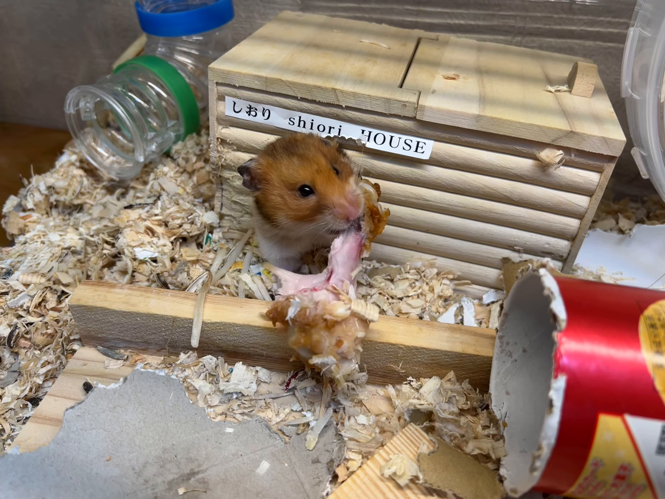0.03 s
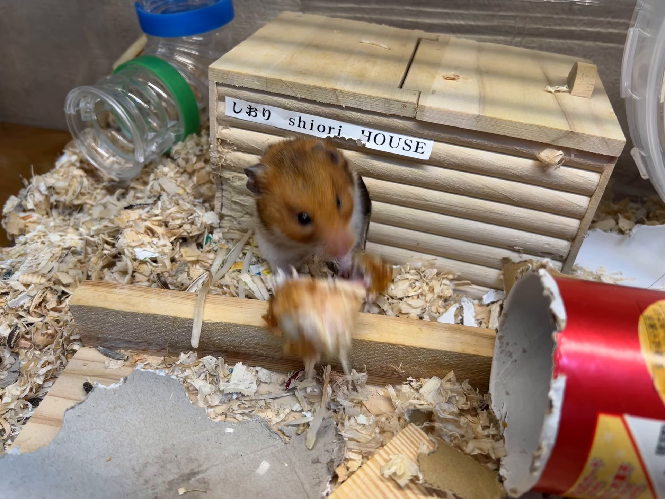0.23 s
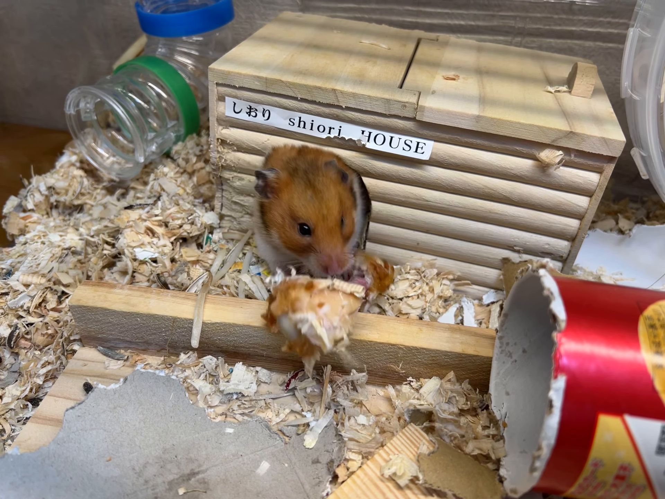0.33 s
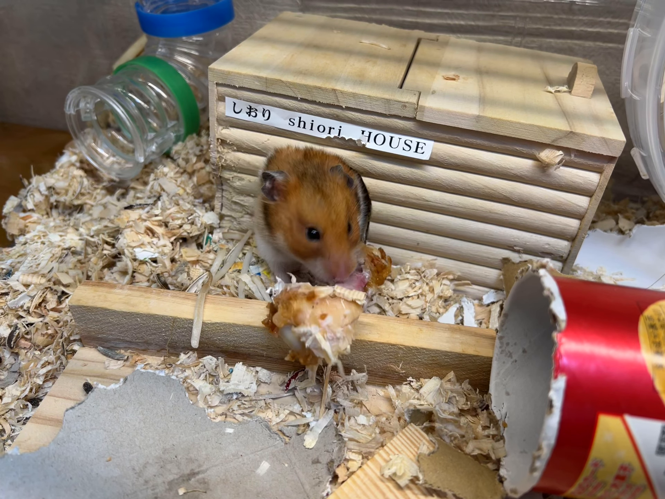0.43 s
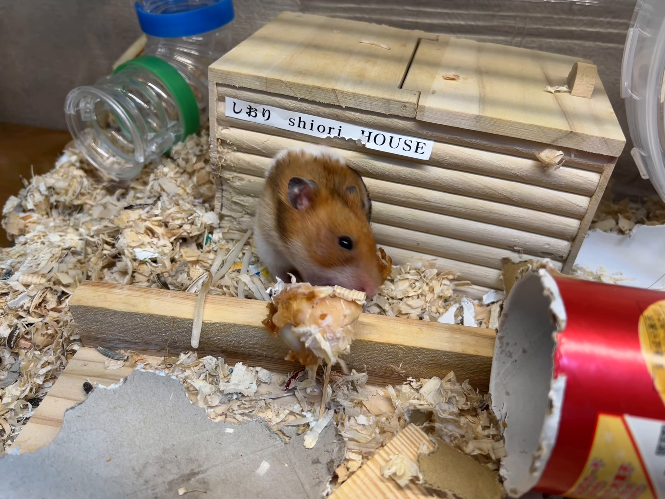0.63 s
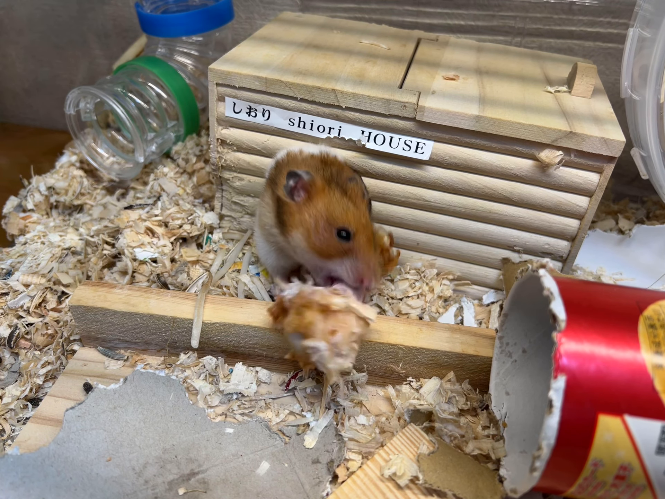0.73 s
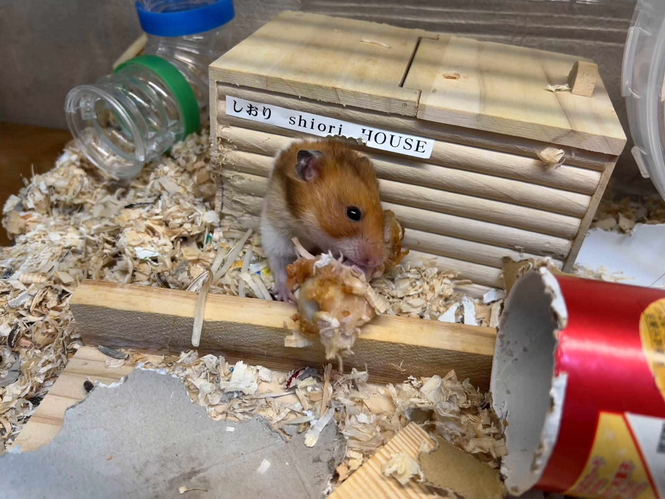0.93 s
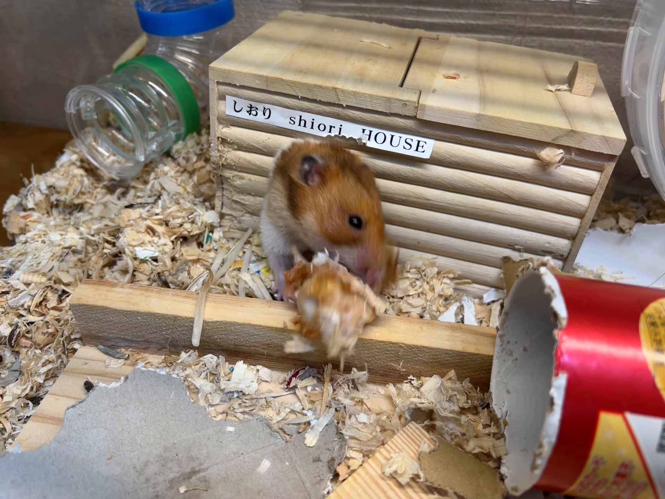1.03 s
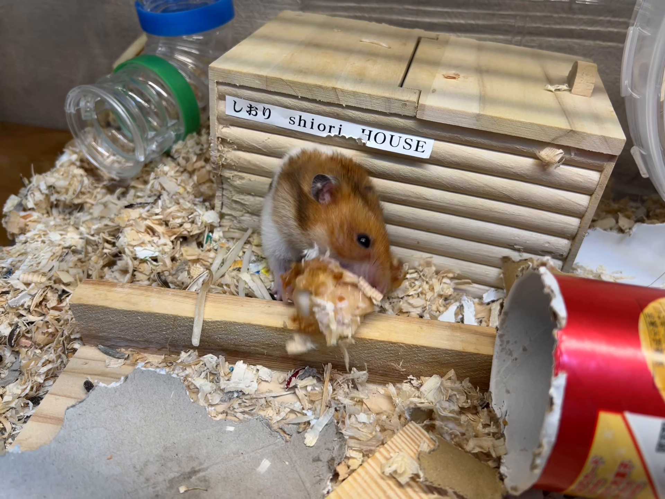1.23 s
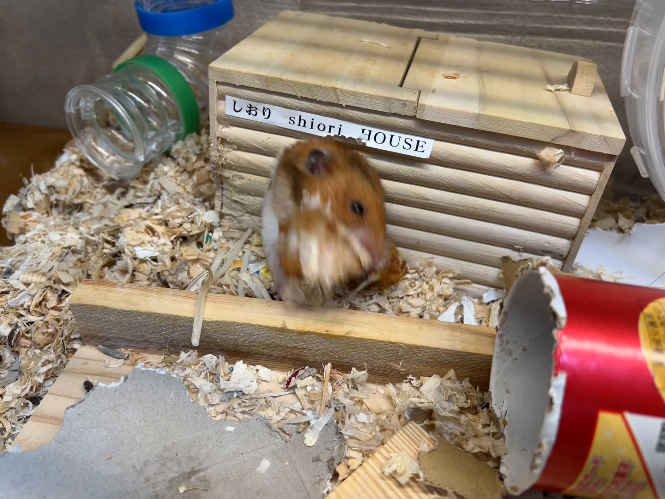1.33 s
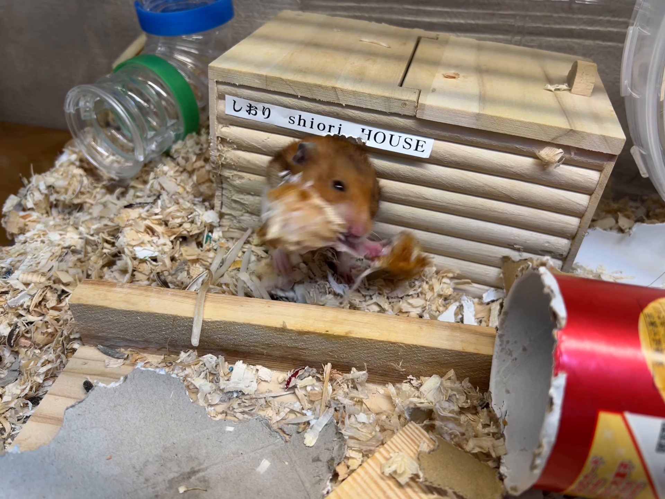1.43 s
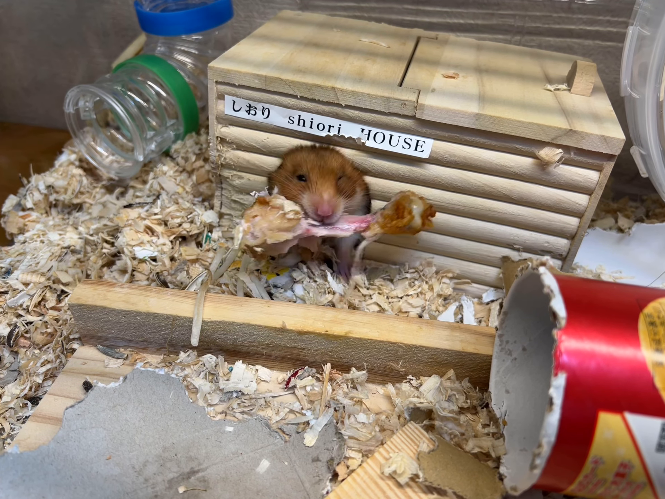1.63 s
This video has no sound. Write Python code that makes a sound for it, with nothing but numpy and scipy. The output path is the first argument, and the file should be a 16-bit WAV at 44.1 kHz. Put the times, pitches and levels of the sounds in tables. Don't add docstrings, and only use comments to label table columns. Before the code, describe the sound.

A bone bumps a plastic cage floor and raps a wooden slat, with tiny tooth ticks

```python
import sys
import numpy as np
from scipy import signal
from scipy.fft import rfft, irfft, next_fast_len
from scipy.io import wavfile
from scipy.ndimage import uniform_filter1d

SR = 44100
rng = np.random.default_rng(int(sys.argv[2]) if len(sys.argv) > 2 else 0)


def dump(signal):
    limited = np.clip(np.atleast_2d(signal).T, -1, 1)
    pcm = np.round(limited * 32767).astype(np.int16)
    wavfile.write(sys.argv[1], SR, pcm)


def volts(x):
    e = np.asarray(x, float) / 20
    return 10 ** e


N = 74970

# pitch in Hz, level in dB, time to fall 60 dB in seconds.
FLOOR_MIDDLE = [(73.2, -5, 0.12), (98.2, -6, 0.15), (124.5, -12, 0.38), (165.5, 5, 0.098),
                (211.5, -12.5, 0.16), (308, -15.5, 0.11), (377.3, -18.5, 0.14), (495, -30.5, 0.094)]
FLOOR_BY_SLAT = [(98.4, -6.5, 0.27), (132, -21, 0.27), (165, 8.5, 0.14), (300, -7.5, 0.24)]
FLOOR_RIM = [(75.6, -16, 0.17), (100.4, -4.5, 0.13), (124, -12.5, 0.041), (158.2, -6.5, 0.19),
             (239, -36, 0.17), (308, -21, 0.055)]
FLOOR_CORNER = [(99.4, -6, 0.18), (162.3, -0.5, 0.16), (205, -17.5, 0.14)]
CAGE_ROCK = [(61, 3.5, 0.12), (78, -0.5, 0.23)]
WOODEN_HOUSE = [(392.2, -1.5, 0.11), (745, -14, 0.094), (1090, -20, 0.076)]
SLAT_MODES = [(434, -19, 0.37), (463.6, -3, 0.062), (565, -9, 0.057), (702, -33, 0.11), (779, -29.5, 0.32),
              (901, -19, 0.18), (962, -24, 0.068), (1028, -16.5, 0.069), (1138, -19.5, 0.14),
              (1262, -22.5, 0.14), (1535, -22.5, 0.086), (2317, -15.5, 0.014), (2500, -63, 0.009),
              (3230, -21, 0.013)]
FLOOR_FLAT_MODES = [(363, -26, 0.09), (500, -8, 0.038), (547, -2.5, 0.11), (732, -15.5, 0.073),
                    (1040, -20, 0.056), (1590, -13, 0.02)]

# time of full contact in seconds, level in dB, build-up in seconds,
# damping (above 1 dies faster).
MIDDLE_THUMPS = [
    (0.02, -57, 0.0025, 1.3),
    (0.2259, -42, 0.011, 0.82),
    (0.2363, -33.5, 0.0066, 0.88),
    (0.2435, -22.5, 0.0081, 0.65),
    (0.29, -39.5, 0.0047, 1),
    (1.668, -54, 0.042, 1.2),
]
SLAT_THUMPS = [
    (0.9235, -38, 0.016, 1.7),
    (0.9414, -45, 0.0099, 1.6),
]
RIM_THUMPS = [
    (1.091, -29.5, 0.011, 1.64),
    (1.103, -35.5, 0.0065, 1.7),
    (1.111, -43, 0.0045, 1.6),
    (1.187, -49.5, 0.013, 2.5),
    (1.234, -48.5, 0.0096, 1.7),
]
CORNER_THUMPS = [
    (.7014, -40, .018, 0.89),
    (1.125, -47.5, 0.01, 1),
    (.765, -56, .015, 1),
]
ROCK_THUMPS = [
    (0.041, -56.5, 0.018, 0.64),
    (0.326, -48.5, 0.044, 2.6),
    (0.421, -57, 0.037, 1.4),
    (0.718, -54.5, 0.025, 1.8),
    (0.9401, -39, 0.04, 0.8),
    (0.973, -40, 0.017, 0.73),
    (1.303, -54.5, 0.059, 1.3),
    (1.629, -55.5, 0.021, 0.82),
]
HOUSE_THUMPS = [
    (1.285, -48, 0.0073, 3.8),
    (1.367, -60, 0.005, 0.86),
    (1.395, -59, 0.0036, 1.4),
    (1.427, -55.5, 0.017, 1.4),
    (1.643, -44.5, 0.0044, 1.5),
    (1.683, -51.5, 0.011, 1.3),
]

# start in seconds, level in dB, hardness in dB per octave, damping.
SLAT_KNOCKS = [
    (0.017, -58, 5.5, 1.6),
    (0.722, -63.5, 2.5, 1.3),
    (.894, -50.5, 3.5, 1),
    (0.9039, -29, 1.5, 0.85),
    (1.279, -68, 6.5, 0.86),
    (1.443, -60.5, 7, 1.4),
    (1.638, -59, 0.5, 0.52),
    (1.655, -63.5, 9.5, 1.8),
]
FLAT_KNOCKS = [
    (.228, -37, -6.5, 1.2),
    (.2325, -33, -10.5, 0.92),
]
# frequency in Hz, level in dB per Hz.
RATTLE_COLOUR = [(200, -3.5), (500, 6.5), (800, -1), (1200, -2), (3300, -22.5), (6000, -38.5), (15000, -50)]
# frequency in Hz, time to fall 60 dB in seconds.
RATTLE_T60 = [(300, 0.32), (1000, 0.1), (3000, 0.11), (8000, 0.096)]

# start in seconds, peak in dB, pitch in Hz, 60 dB fall in seconds.
TOOTH_TICKS = [(0.017, -36.5, 11300, 0.013), (0.017, -36, 6500, 0.018), (0.038, -40.5, 15000, 0.024),
               (0.173, -67, 10750, 0.15), (.453, -58.5, 11200, 0.037), (0.516, -57, 10700, 0.02),
               (0.562, -57, 10600, 0.064), (.631, -49.5, 6900, 0.04), (0.8, -58, 11900, 0.033),
               (1.053, -47, 12000, 0.036), (1.184, -52, 12400, 0.022), (1.309, -84, 10400, 0.08),
               (1.468, -45, 11300, 0.038)]
BONE_PINGS = [
    (.227, -29, 2780, 0.023),
    (.228, -38, 3400, 0.026),
    (0.277, -50, 2360, 0.16),
    (.66, -46, 6000, 0.044),
    (0.672, -48, 6300, 0.049),
    (.722, -44, 990, 0.054),
    (1.635, -59, 2420, .1),
]

# start in seconds, level in dB, rise in seconds, 60 dB fall in seconds,
# brightness in dB per octave.
PAW_SCUFFS = [(.001, -61.5, 0.0024, 0.21, -4.5), (.205, -68, 0.016, 0.06, -5),
              (0.223, -63, 0.011, 0.29, -5.5), (.268, -61.5, 0.011, 0.15, 2), (.33, -76, 0.008, 0.12, 2),
              (0.358, -69, 0.016, 0.073, 0.5), (0.701, -68, 0.0059, 0.22, -2.5),
              (.84, -71, 0.033, 0.48, -4), (0.883, -64.5, 0.011, 0.032, 11.5),
              (1.008, -71, 0.012, 0.32, -6), (1.064, -53, 0.018, 0.093, -1.5), (1.09, -70, 0.012, 0.1, -2),
              (1.123, -67.5, 0.0066, 0.12, -1.5), (1.247, -69.5, 0.0089, 0.47, -3.5),
              (1.303, -68.5, 0.012, 0.045, -5.5)]
# time in seconds, level in dB.
RUSTLE_LEVEL = [(0, -73.5), (0.068, -78.5), (0.149, -81), (.34, -76.5), (.48, -83), (.61, -75.5),
                (.74, -81), (.82, -77.5), (.97, -83.5), (1.2, -82), (1.34, -80), (1.4, -72), (1.42, -65),
                (1.48, -63.5), (1.52, -67), (1.63, -66.5), (1.66, -61), (1.7, -57.5)]
# frequency in Hz, level in dB per Hz.
CHIP_COLOUR = [(350, -11), (700, -6), (2000, -11.5), (4500, -8.5), (7500, -7), (11200, -4), (15600, -7)]
BEDDING_COLOUR = [(150, -7.5), (250, -6), (491, -8.5), (1090, -11.5), (2100, -12.5), (2960, -11.5),
                  (9430, -16), (11400, -13.5), (15600, -22.5)]

# time in seconds, level in dB.
TREMBLE_LEVEL = [(0.0, -58), (0.363, -69.5), (0.459, -56.5), (.5, -58.5), (.54, -67), (0.732, -55),
                 (0.86, -66.5), (0.98, -65.5), (1.11, -47.5), (1.168, -58), (1.42, -55.5), (1.7, -63.5)]
# frequency in Hz, level in dB per Hz.
HUM_COLOUR = [(15, -63), (25, -59), (46, 4.5), (75, 11), (128, 6), (170, 4.5), (194, 0.5), (387, -22),
              (600, -57), (780, -40), (1320, -120)]
HISS_COLOUR = [(180, 3), (300, 0.5), (809, -7), (1570, -14), (2180, -11), (2840, -31.5), (3760, -16),
               (15600, -61)]


def unit(x):
    return x / np.sqrt(np.mean(x ** 2) + 1e-20)


def along(points, hz):
    f, v = np.transpose(points)
    return np.interp(np.log(hz + 1), np.log(f + 1), v)


def filtered(x, response):
    size = next_fast_len(len(x) + SR // 4)
    spectrum = rfft(x, size) * response(np.fft.rfftfreq(size, 1 / SR))
    return irfft(spectrum, size)[:len(x)]


def add(track, s, sound):
    part = track[round(max(s, 0) * SR):][:len(sound)]
    part += sound[:len(part)]


def dying(t60s):
    hz, t, z = signal.stft(rng.standard_normal(SR // 2), SR, nperseg=128)
    fade = volts(-60 * t / t60s(hz)[:, None])
    return signal.istft(z * fade, SR, nperseg=128)[1]


def patchy(x, colour, patch_db, bins, frames):
    z = signal.stft(x, nperseg=512)[2]
    field = uniform_filter1d(rng.standard_normal(z.shape), bins, 0)
    field = uniform_filter1d(field, frames, 1)
    x = signal.istft(z * volts(patch_db * unit(field)), nperseg=512)[1][:N]
    return unit(filtered(x, lambda hz: volts(along(colour, hz))))


def ring(modes, tilt_db, rise_s, damping, scatter_db):
    hz, db, t60 = np.transpose(modes)[:, :, None]
    t = np.arange(SR // 2) / SR - rise_s
    db = db + tilt_db * np.log2(hz / 485) + scatter_db * rng.standard_normal(hz.shape)
    swell = np.sin(np.pi / 2 * np.clip(1 + t / rise_s, 0, 1)) ** 2
    level = volts(db - 60 * np.maximum(t, 0) * damping / t60)
    return np.sum(level * swell * -np.sin(2 * np.pi * hz * t), axis=0)


def thumps():
    out = np.zeros(N)
    spots = [(FLOOR_MIDDLE, MIDDLE_THUMPS), (FLOOR_BY_SLAT, SLAT_THUMPS), (FLOOR_RIM, RIM_THUMPS),
             (FLOOR_CORNER, CORNER_THUMPS), (CAGE_ROCK, ROCK_THUMPS), (WOODEN_HOUSE, HOUSE_THUMPS)]
    for modes, blows in spots:
        for s, db, rise_s, damping in blows:
            add(out, s - rise_s, volts(db) * ring(modes, 0, rise_s, damping, 0))
    return out


def rattle(tilt_db, damping):
    rise_s, delay = 0.0015, 40
    noise = dying(lambda hz: along(RATTLE_T60, hz) / damping)
    puff = filtered(np.pad(noise, (delay, 0)),
                    lambda hz: volts(along(RATTLE_COLOUR, hz) + tilt_db * np.log2((hz + 50) / 485)))
    t = np.arange(SR // 2) / SR
    return puff[:SR // 2] * np.clip(t / rise_s, 0, 1) ** 2


def knocks():
    contact_s, scatter_db, rattle_db = 0.00114, 3, 1
    out = np.zeros(N)
    for modes, hits in [(SLAT_MODES, SLAT_KNOCKS), (FLOOR_FLAT_MODES, FLAT_KNOCKS)]:
        for s, db, tilt_db, damping in hits:
            buzz = volts(rattle_db) * rattle(tilt_db, damping)
            tone = ring(modes, tilt_db, contact_s, damping, scatter_db)
            add(out, s, volts(db) * (tone + buzz))
    return out


def ticks():
    rise_s, wide_db = 0.004, -19.5
    out, t = np.zeros(N), np.arange(SR // 8) / SR
    for rows, q in [(TOOTH_TICKS, 7), (BONE_PINGS, 14)]:
        for s, db, hz, t60 in rows:
            fade = volts(-60 * t / t60) * (1 - np.exp(-t / rise_s))
            burst = rng.standard_normal(len(t)) * fade
            width = hz / q

            def response(f):
                resonance = 1j * f * width / (hz * hz - f * f + 1j * f * width)
                return resonance + volts(wide_db) * (f > hz / 2)

            add(out, s, volts(db) * filtered(burst, response))
    return out


def crackle():
    snaps_per_s, spread_db, snap_share = 5000, 1.5, 0.35
    chance, size = rng.random((2, N))
    strength = volts(-spread_db * np.log(size)) * rng.standard_normal(N)
    snaps = (chance < snaps_per_s / SR) * strength
    return snap_share * unit(snaps) + (1 - snap_share) * rng.standard_normal(N)


def scuffs():
    out, t = np.zeros(N), np.arange(SR // 4) / SR
    chips = patchy(crackle(), CHIP_COLOUR, 2, 20, 3)
    for s, db, rise_s, t60, tilt_db in PAW_SCUFFS:
        stroke = volts(db - 60 * np.maximum(t - rise_s, 0) / t60) * np.clip(t / rise_s, 0, 1) ** 2
        part = chips[round(s * SR):][:len(t)] * stroke
        add(out, s, filtered(part, lambda hz: volts(tilt_db * np.log2((hz + 300) / 6000))))
    return out


def rustle():
    level_db = np.interp(np.arange(N) / SR, *np.transpose(RUSTLE_LEVEL)) + 1
    return volts(level_db) * patchy(crackle(), BEDDING_COLOUR, 1.5, 8, 9)


def walls(x):
    t60 = [(100, 0.35), (1000, 0.2), (8000, 0.028)]  # Hz, seconds
    tail = dying(lambda hz: along(t60, hz))
    late = np.pad(x, (200, 0))
    return signal.fftconvolve(late, tail / np.linalg.norm(tail))[:N]


def tremble():
    level_db = np.interp(np.arange(N) / SR, *np.transpose(TREMBLE_LEVEL))
    return volts(level_db) * patchy(rng.standard_normal(N), HUM_COLOUR, 0.5, 3, 9)


def room_hiss():
    return volts(-76) * patchy(rng.standard_normal(N), HISS_COLOUR, 0.55, 12, 12)


def scene():
    floor = thumps()
    taps = knocks() + ticks()
    echo = walls(volts(-19) * taps + volts(-16) * floor)
    mix = floor + taps + scuffs() + rustle() + echo + tremble() + room_hiss()
    return mix[None]


def roll_off(x):
    return signal.sosfilt(signal.butter(12, 15720, fs=SR, output="sos"), x)


def record(dry):
    low_cut_hz, top_hz = 52, 15720
    mix = filtered(dry[0], lambda f: (f < top_hz) * f ** 6 / np.sqrt(f ** 12 + low_cut_hz ** 12))
    return roll_off(mix[None])


dry = scene()
out = record(dry)
dump(out)
```